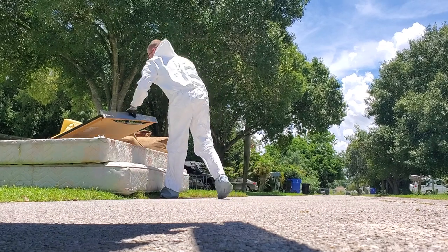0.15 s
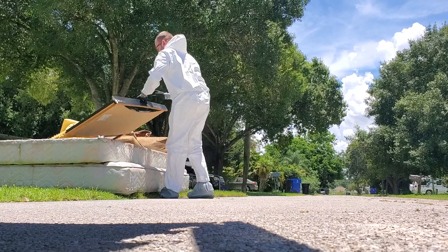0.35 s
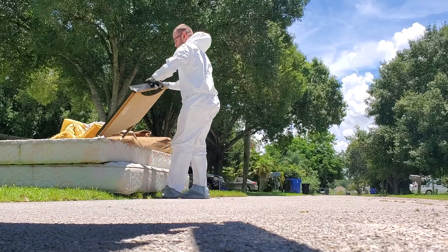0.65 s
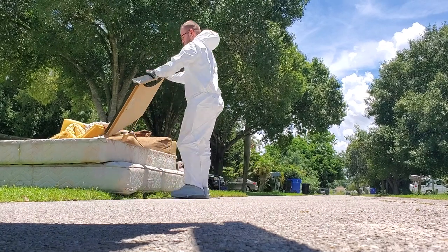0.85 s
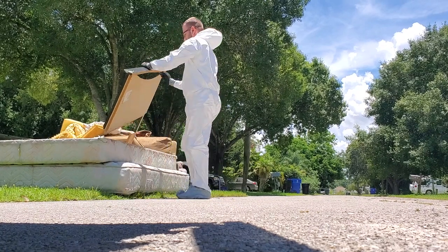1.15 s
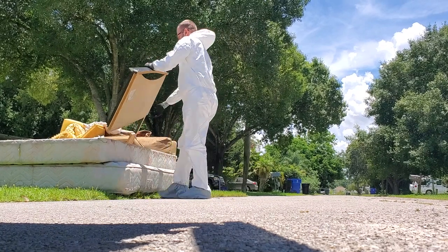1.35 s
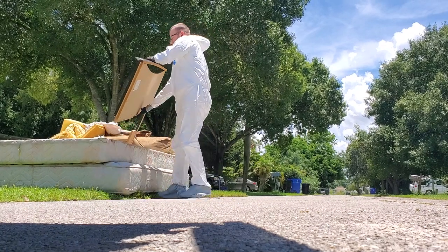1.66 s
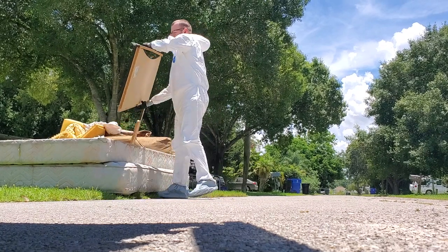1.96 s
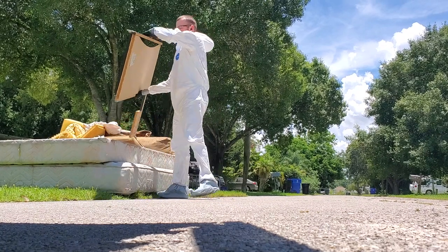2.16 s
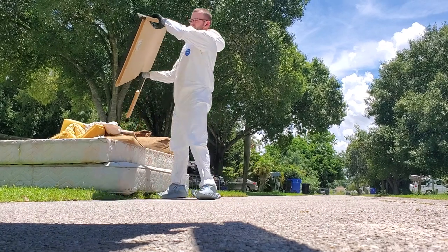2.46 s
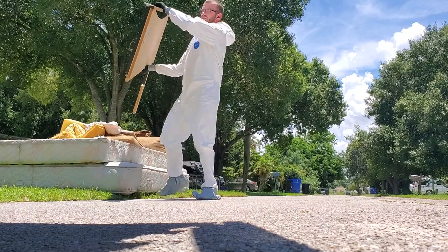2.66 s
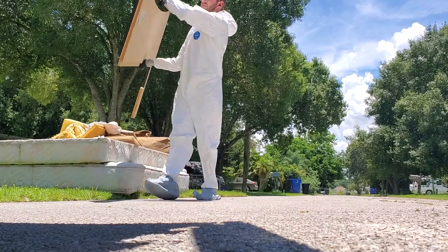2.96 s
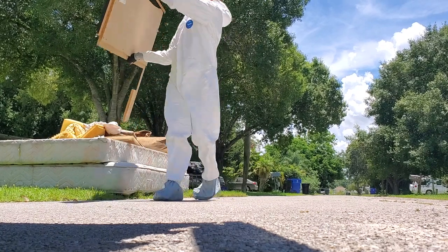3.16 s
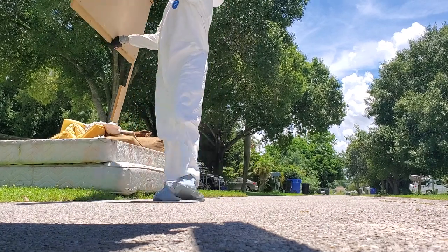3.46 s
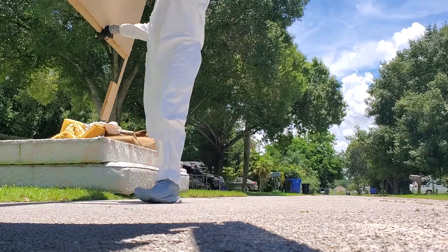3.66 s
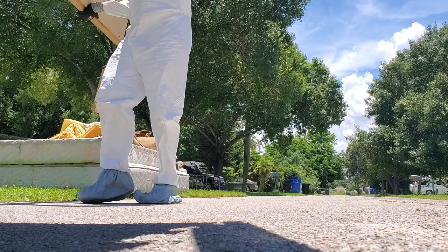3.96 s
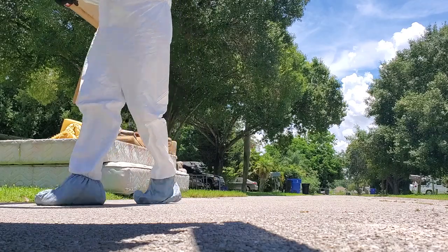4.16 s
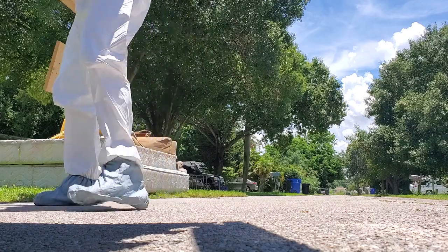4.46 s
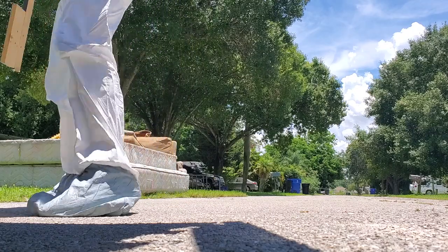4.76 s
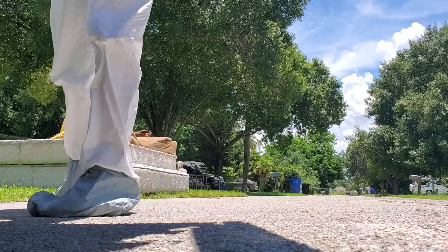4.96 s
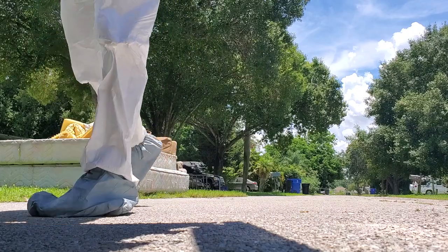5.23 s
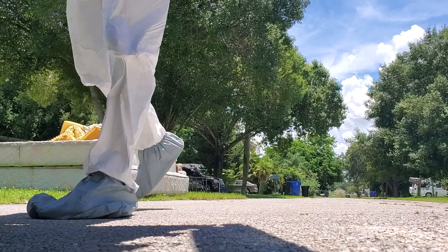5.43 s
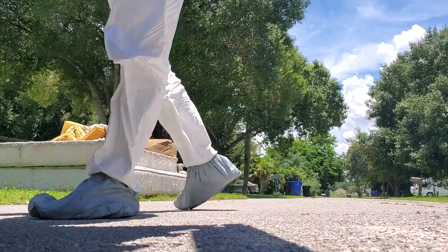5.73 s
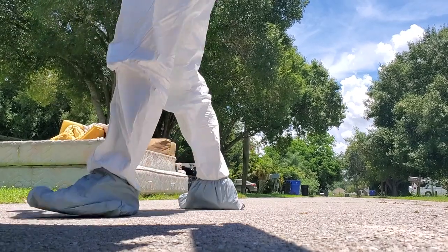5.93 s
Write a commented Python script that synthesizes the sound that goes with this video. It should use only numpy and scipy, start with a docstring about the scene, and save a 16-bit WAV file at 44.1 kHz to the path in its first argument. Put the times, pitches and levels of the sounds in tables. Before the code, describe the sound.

A faint suburban hiss and low traffic rumble run throughout, heard from a microphone on the asphalt. In the first second a plastic coverall swishes and crackles softly as a framed panel is lifted, wobbling with several dull, low flaps. From about 1 to 3 seconds the rustling is fainter, with scattered small ticks of creases and grit. Between 3 and 5.2 seconds shoe covers scuff and the suit swishes more clearly, notably around 3.4, 4.1 and 5 seconds, with a few soft footfalls. At about 5.3 seconds the panel crashes into a steel bin, close and slightly left, far louder than everything before. More blows follow quickly around 5.5, 5.6, 5.7 and 5.8 seconds, each with a rattle whose brightness dies first. The frame thuds heavily and the steel walls boom and ring, fading as the sound ends just after 6 seconds.

```python
"""A framed panel thrown into a steel bin crashes, rattles and booms, just left of a phone on the asphalt.
Each blow starts a rattle that dies first in the treble; the frame thuds and the steel walls ring on.
Before that, a man in a plastic coverall lifts the panel off a kerbside pile and carries it past:
suit and shoe covers rustle, scuff and tick, the panel wobbles. A far suburban rumble lies under it all."""
import sys
import numpy as np
from scipy import signal
from scipy.fft import rfft, irfft, next_fast_len
from scipy.io import wavfile
from scipy.ndimage import uniform_filter1d

SR = 44100
rng = np.random.default_rng(int(sys.argv[2]) if len(sys.argv) > 2 else 0)


def wav_record(signal):
    """Record a signal, one row per channel, as 16-bit PCM in the file named by sys.argv[1]."""
    frames = np.transpose(np.atleast_2d(signal))
    bounded = np.clip(frames, -1, 1)
    # unit amplitude maps onto the largest positive 16-bit level
    quanta = np.round(bounded * 32767).astype(np.int16)
    wavfile.write(sys.argv[1], SR, quanta)


N = 268569

# far hiss spectrum: freq_hz, gain_db
HISS_SPECTRUM = [(71, -32), (120, 7.5), (166, -5), (236, -3), (301, -7.5), (472, -10), (641, -16),
                 (965, -23.5), (1280, -31), (6200, -32.5), (7760, -47.5), (14900, -38.5), (15900, -31)]
# throb of far traffic and flexing panel: time_s, level_db
THROB_LEVELS = [(0, -42), (0.3, -43), (0.6, -41.5), (0.9, -43), (1.15, -39), (1.45, -48.5), (1.76, -39.5),
                (1.92, -60), (2.02, -42.5), (2.6, -45), (3.2, -42.5), (3.55, -45), (4.3, -41),
                (4.45, -47.5), (4.75, -42.5), (5.24, -42)]
# throb spectrum: freq_hz, gain_db
THROB_SPECTRUM = [(15, -66), (25, -30), (39, 6), (59, 5), (108, -2), (140, -15.5), (189, -18), (250, -16),
                  (320, -46), (550, -120)]
# panel flaps and footfalls: start_s, peak_db, pitch_hz, t60_s
THUMPS = [(0.014, -25.5, 84, 0.093), (0.11, -31, 79, 0.089), (0.241, -32.5, 109.3, 0.2),
          (0.389, -33, 80.7, 0.15), (0.43, -32, 62, 0.15), (0.509, -22, 78, 0.16), (0.609, -32, 61.9, 0.07),
          (0.691, -43, 70, 0.12), (0.848, -24.5, 58, 0.085), (0.953, -28, 66, 0.22), (4.11, -32, 90, 0.13),
          (4.819, -42, 70, 0.15), (4.945, -37, 80, 0.14), (5.05, -30, 84, 0.19)]
# rustle registers: centre_hz
RUSTLE_HZ = [240, 480, 950, 1900, 3200, 5200, 7900, 11000]
# share of each rustle register: gain_db
RUSTLE_DB = [-7.5, -5, -9, -6.5, -4, -3.5, -8, 0]
# faint stir of the suit: time_s, level_db, scuff_db
STIR = [(0, -63.5, -60), (0.63, -69, -57.5), (1.1, -64.5, -51.5), (1.6, -71.5, -58.5), (2.0, -78, -61),
        (2.45, -75.5, -61), (2.85, -69.5, -57.5), (3.5, -65, -59), (4.0, -61, -54.5), (4.5, -64.5, -57.5),
        (4.9, -63, -53.5), (5.15, -63, -59), (5.25, -69, -49)]
# suit swishes and shoe cover scuffs; rise and fall span 20 dB:
# start_s, level_db, hold_s, rise_s, fall_s, weight_db, bright_db, crisp_db
SWISHES = [(0.013, -44, .01, 0.0099, 0.11, 11, -1.5, -18),
           (0.222, -48.5, 0.077, 0.043, 0.065, 4, -12.5, -11),
           (0.314, -44.5, .005, .02, 0.18, -7, -12, -13), (0.394, -46, 0.048, 0.16, .05, -0.5, -5.5, -11),
           (0.516, -51.5, .01, 0.029, 0.075, 13, -7, -10), (0.686, -53, 0.089, 0.068, 0.11, -3, 1, -4.5),
           (0.764, -42, 0.059, 0.048, .05, 3, -4.5, -13.5), (0.927, -41, .005, 0.029, 0.082, -4, -6, -11),
           (1.212, -62, .005, .15, 0.079, -5, -5.5, -22), (1.371, -55, .005, 0.064, 0.069, -6, -1.5, -4),
           (1.459, -53.5, 0.0044, 0.016, 0.12, 0, -6, -7), (1.687, -57.5, 0.0044, 0.082, 0.042, -4, 0, -4),
           (2.082, -59, 0.023, .06, .17, 5, -7, -12), (2.301, -66.5, .005, 0.23, .03, 10, -3, -4),
           (2.514, -61.5, .005, 0.023, .05, -4, -2, 0.5), (2.69, -59, .005, .25, .14, -9, -1.5, -3.5),
           (2.954, -47, .005, 0.057, 0.32, -8.5, -4.5, -7.5), (3.05, -53.5, .005, .05, 0.13, -6, -3, -7),
           (3.225, -56.5, .005, 0.25, 0.12, 5.5, -4, -5.5), (3.337, -48.5, .02, 0.012, .05, -1, 3, -2),
           (3.367, -37.5, 0.019, 0.035, 0.06, -1.5, -2, -7),
           (3.462, -52.5, .005, 0.013, 0.054, -1, 1.5, -2), (3.636, -59, .005, 0.027, 0.26, 7, -5, -7),
           (3.72, -62.5, 0.17, .08, 0.51, 3, -12, -5), (3.985, -57.5, .03, .03, .05, -3, 1.5, 2.5),
           (4.03, -45.5, 0.018, 0.028, 0.035, -6, 3.5, 2), (4.066, -49.5, 0.057, 0.044, .05, 2, 2, 2.5),
           (4.134, -44, 0.024, 0.063, 0.045, -0.5, -14, -15),
           (4.248, -53.5, .005, 0.25, 0.099, 3.5, -12, -4),
           (4.678, -59.5, .07, 0.037, 0.27, 8.5, -1.5, 1.5), (4.952, -48, 0.055, 0.048, 0.11, 4, 2.5, -2.5),
           (5.06, -46, 0.061, 0.17, 0.031, 2.5, -6, -6)]
# single creases and grit: start_s, relative_db, pitch_hz, t60_s, knock_offset_db, snap_offset_db
TICKS = [(0.0209, -27.5, 3100, 0.016, -17, -26), (0.0344, -36, 2480, 0.018, -16, -26),
         (0.0603, -40, 3280, 0.02, -15, -23), (0.0817, -36, 3570, 0.023, -20, -29),
         (0.2109, -43.5, 2550, 0.038, 5, -25), (0.2843, -40.5, 2920, 0.032, 3, -22),
         (0.3162, -34, 2460, 0.026, -21, -26), (0.5187, -37.5, 2280, 0.018, 0.5, -5),
         (0.5252, -32, 2530, 0.017, -3, -28), (0.9113, -38.5, 1380, 0.022, -7, -20),
         (1.3359, -49, 5470, 0.02, -11, -16), (1.3758, -46, 2300, 0.022, -10, -19),
         (1.457, -37.5, 1340, 0.029, -11, 13), (1.8098, -48.5, 2780, 0.015, -7, -24),
         (2.0887, -37, 4620, 0.03, -10, -26), (2.2458, -61, 2690, 0.02, 1, -14),
         (2.5122, -49, 1310, 0.02, -11, -17), (3.235, -45.5, 1200, 0.023, -7, -15),
         (3.3343, -40, 2050, 0.022, -3.5, -16), (3.4585, -41, 2770, 0.017, -8, -17),
         (3.6316, -46.5, 1920, 0.023, -12, -17), (4.0262, -35.5, 1930, 0.022, -5, -10),
         (4.0647, -38, 1420, 0.018, -6, -12), (4.1485, -26, 2380, 0.018, -15, -29),
         (4.6804, -51.5, 1200, 0.02, 13.5, -1), (4.7361, -41, 1210, 0.018, 1.5, -19),
         (4.7844, -46.5, 1170, 0.022, -7, -10), (5.1188, -32.5, 2850, 0.038, -13, -24)]
# ringing of the bin walls: time_s, boom_gain_db, drum_gain_db
WALL_GAINS = [(5.268, -13, -11.5), (5.38, -19, -19), (5.44, -15, -24.5), (5.522, -8, -16),
              (5.64, -13.5, -23.5), (5.8, -10.5, -19.5), (5.96, -13, -27), (6.09, -10.5, -26)]
# low bin modes: freq_hz, width_hz, gain_db
BOOM_MODES = [(63, 14, 0.5), (88.7, 14.5, -1.5), (125.6, 20, -2.5)]
# steel plate modes: freq_hz, gain_db, ring_factor
PLATE_MODES = [(343.4, 7, 0.34), (615, 2, 5.8), (656, -11, 0.96), (794, -3.5, 0.6), (927, -8, 0.56),
               (1070, -28, 0.69), (1357, -14, 0.4), (1600, -25, 0.71), (1782, -16, 0.7), (1990, -20, 0.41),
               (2100, -31, 0.26), (2260, -31, 0.49), (2490, -43, 0.48), (2700, -39, 0.48)]
# blows in the bin: start_s, gain_db, hardness_db_per_octave, rise_s, ring_factor
BLOWS = [(5.266, -13, 1.5, 0.003, 1.3), (5.294, -9, 3.6, 0.0036, 0.82), (5.495, -12, 3, 0.0035, 0.58),
         (5.618, -18.5, -1.5, 0.0028, 0.58), (5.6379, -7, 1.1, 0.0021, 1.34),
         (5.7058, -4, 2.5, 0.0029, 1.04), (5.7294, -26, 5, 0.003, 3.1), (5.7975, -17, -2.5, 0.0022, 1.5),
         (5.858, -26.5, -2.7, 0.0032, 3), (5.9502, -33, -6, 0.003, 1.1)]
# clatter spectrum: freq_hz, gain_db
CLATTER_SPECTRUM = [(88, -27), (150, 2), (249, -5), (398, -5), (834, -5.5), (1210, -12), (1930, -10.5),
                    (3460, -14.5), (4290, -15), (6470, -20.5), (8170, -33), (15900, -37.5)]
# clatter decay per register: centre_hz, base_t60_s
CLATTER_DECAY = [(250, 1), (500, 0.69), (1000, 0.67), (2000, 0.42), (3500, 0.25), (6000, 0.18),
                 (11000, 0.18)]
# frame landing on steel: start_s, peak_db, pitch_hz, t60_s
THUDS = [(5.2646, -7.5, 235, 0.017), (5.271, -5., 477, 0.033), (5.27, -9.5, 89.9, 0.38),
         (5.407, -7.5, 94.4, 0.2), (5.497, -4.5, 67.5, 0.26), (5.597, -4.5, 63.5, 0.098),
         (5.805, -8.5, 70.7, 0.34)]


def undb(db):
    return 10 ** (np.asarray(db) / 20)


def level(x, rms_db):
    return x * undb(rms_db) / np.sqrt(np.mean(x ** 2))


def pan(left_minus_right_db):
    return undb([[left_minus_right_db / 2], [-left_minus_right_db / 2]])


def curve(table):
    """Table columns, interpolated per sample."""
    time_s, *columns = np.transpose(table)
    return [np.interp(np.arange(N) / SR, time_s, column) for column in columns]


def colour(x, spectrum, size=4096):
    """Minimum-phase filter, via the cepstrum."""
    hz, db = np.transpose(spectrum)
    log_hz = np.log(np.arange(size // 2 + 1) * SR / size + 1)
    cepstrum = irfft(np.interp(log_hz, np.log(hz), db) * np.log(10) / 20)
    cepstrum[1:size // 2] *= 2
    cepstrum[size // 2 + 1:] = 0
    impulse = irfft(np.exp(rfft(cepstrum)))
    return signal.fftconvolve(x, impulse[None], axes=1)[:, :x.shape[1]]


def band(x, low_hz, high_hz):
    sos = signal.butter(2, [low_hz, min(high_hz, SR / 2.1)], "band", fs=SR, output="sos")
    return signal.sosfilt(sos, x)


def highpass(x, hz):
    return signal.sosfilt(signal.butter(1, hz, "high", fs=SR, output="sos"), x)


def registers(x, centres_hz):
    """Overlapping bands that sum to x."""
    size = next_fast_len(x.shape[1])
    spectrum = rfft(x, size)
    log_hz = np.log(np.arange(size // 2 + 1) * SR / size + 1)
    weights = [np.interp(log_hz, np.log(centres_hz), row) for row in np.eye(len(centres_hz))]
    return [irfft(spectrum * weight, size)[:, :x.shape[1]] for weight in weights]


def walk(rate_hz):
    """Smoothed random steps, spread near 1."""
    hold = int(SR / rate_hz)
    steps = np.repeat(rng.standard_normal(N // hold + 1), hold)
    return 1.14 * uniform_filter1d(uniform_filter1d(steps, hold), hold)[:N]


def ring(x, hz, t60_s):
    """One decaying mode."""
    radius = np.exp(-np.log(1000) / (t60_s * SR))
    angle = 2 * np.pi * hz / SR
    return signal.lfilter([np.sin(angle)], [1, -2 * radius * np.cos(angle), radius ** 2], x)


def ports(x, lag_samples):
    """Two microphone ports, the right one late."""
    index = np.arange(len(x))
    return np.array([x, np.interp(index - lag_samples, index, x)])


def grains(rate_hz, spread_db, bed, lag_samples, scatter_hz, scatter_db, size=N):
    """Random snaps over even noise; scattered treble takes its own path to each port."""
    snaps = (rng.random(size) < rate_hz / SR) * undb(spread_db * np.minimum(rng.exponential(size=size), 3))
    direct, left, right = rng.standard_normal((3, size)) * np.hypot(level(snaps, 0), bed)
    scatter = undb(scatter_db) * highpass([left, right], scatter_hz)
    return level(ports(direct, lag_samples) + scatter, 0)


def knocks(start_s, peak_db, pitch_hz, t60_s, noise_share, band_ratio, contact=1.1):
    """Short knocks: pitched ring, sharp contact, rough tail."""
    track, t = np.zeros(N + SR), np.arange(SR // 5) / SR
    for onset_s, db, hz, decay_s in np.broadcast(start_s, peak_db, pitch_hz, t60_s):
        grit = rng.standard_normal(len(t))
        grit[0] += contact * np.sqrt(SR / hz)
        rough = level(band(grit, hz / band_ratio, hz * band_ratio), -3.5)
        tone = np.sin(2 * np.pi * hz * t)
        knock = ((1 - noise_share) * tone + noise_share * rough) * 1000. ** (-t / decay_s)
        first = int(onset_s * SR)
        track[first:first + len(t)] += undb(db) * knock / np.abs(knock).max()
    return track[:N]


def far_hiss():
    """Smooth suburban noise, treble leaning left."""
    mid, side = colour(rng.standard_normal((2, N)), HISS_SPECTRUM)
    side = highpass(side, hz=600)
    hiss = level(np.array([mid + side, mid - side]), rms_db=-53) * undb(2.5 * walk(rate_hz=2.89))
    return hiss + 0.44 * highpass(hiss, hz=900) * [[1], [-1]]


def low_throb():
    """Wavering bass of far traffic and flexing panel, with flaps and footfalls."""
    bass = level(colour(rng.standard_normal((1, N)), THROB_SPECTRUM), 0)
    throb = bass * undb(curve(THROB_LEVELS)[0] + walk(rate_hz=18))
    thumps = knocks(*np.transpose(THUMPS), noise_share=0.36, band_ratio=1.92, contact=0.37)
    return (throb + thumps) * pan(1.2)


def tints_db(weight_db, bright_db, crisp_db):
    """Lift per rustle register: weight for the low scuff, bright and crisp for the top."""
    return [weight_db, weight_db, weight_db / 3, 0,
            bright_db / 3, bright_db, (bright_db + crisp_db) / 2, crisp_db]


def suit_rustle():
    """Creasing plastic and grit crackle in swishes over a faint stir."""
    start_s, level_db, hold_s, rise_s, fall_s, *tone_db = np.transpose(SWISHES)[:, :, None]
    t = np.arange(N) / SR
    coarse_s = t[::44]
    away = np.maximum((start_s - coarse_s) / rise_s, (coarse_s - start_s - hold_s) / fall_s)
    swells = undb(-20 * np.clip(away, 0, 6))
    stir_db, scuff_db = curve(STIR)
    stir_tints = tints_db(scuff_db - stir_db, bright_db=-1.5, crisp_db=-0.9)
    crackle = grains(rate_hz=1500, spread_db=1.9, bed=1.62, lag_samples=2.14,
                     scatter_hz=1170, scatter_db=4.3)
    crackle = band(crackle * undb(walk(rate_hz=40)), 190, 15400)
    parts = registers(crackle, RUSTLE_HZ)
    rustle = 0
    for part, share_db, swish_tint, stir_tint in zip(parts, RUSTLE_DB, tints_db(*tone_db), stir_tints):
        power = np.sum((undb(level_db + swish_tint) * swells) ** 2, axis=0)
        swish = np.interp(t, coarse_s, np.sqrt(power)) * pan(1.7)
        stir = undb(stir_db + stir_tint) * pan(2)
        flicker_db = 0.98 * walk(rate_hz=25.06) + 1.75 * walk(rate_hz=150)  # folds open and close
        rustle += level(part, share_db) * np.hypot(swish, stir) * undb(flicker_db)
    return rustle * (t < STIR[-1][0])


def crease_ticks():
    """Single creases and grit: a click with a low knock and a top snap."""
    start_s, db, pitch_hz, t60_s, knock_db, snap_db = np.transpose(TICKS)
    click = knocks(start_s, db + 3, pitch_hz, t60_s, noise_share=0.55, band_ratio=1.9)
    knock = knocks(start_s, db + knock_db, 659, 1.1 * t60_s, noise_share=1, band_ratio=1.1)
    snap = knocks(start_s, db + snap_db - 2.5, 11500, 0.7 * t60_s, noise_share=1, band_ratio=1.45)
    return ports(click + knock + snap, lag_samples=2.7) * pan(1.7)


def bin_walls(rattle, t):
    """The rattle drives the low modes and steel plates of the bin."""
    boom_db, drum_db = (gain_db[-len(t):] for gain_db in curve(WALL_GAINS))
    boom = sum(undb(db) * ring(rattle, hz, t60_s=2.27 / width_hz) * np.sqrt(width_hz)
               for hz, width_hz, db in BOOM_MODES)
    plates = sum(undb(db) * ring(rattle, hz, t60_s=0.64 * ring_factor) / np.sqrt(ring_factor)
                 for hz, db, ring_factor in PLATE_MODES)
    drum = level(plates, -6.5) + level(band(rattle, 202, 607), -3.26)
    return (level(boom, -3) * undb(boom_db) + drum * undb(drum_db)) * (t > BLOWS[0][0])


def panel_clatter(rattle, t):
    """Each blow starts a burst of rattle; treble dies first."""
    parts = registers(rattle, [hz for hz, _ in CLATTER_DECAY])
    clatter = 0
    for part, (hz, base_t60_s) in zip(parts, CLATTER_DECAY):
        power = 0
        for start_s, gain_db, hardness_db_per_octave, rise_s, ring_factor in BLOWS:
            age_s = np.maximum(t - start_s, 0)
            contact = 1 + 0.12 * np.exp(-age_s / 0.0026)
            attack = 1 - np.exp(-age_s / rise_s)
            decay = 1000. ** (-age_s / (base_t60_s * ring_factor))
            gain = undb(gain_db + hardness_db_per_octave * np.log2(hz / 3000))
            power += (gain * contact * attack * decay) ** 2
        chatter_db = 2.15 * walk(rate_hz=120)[-len(t):]  # loose pieces
        clatter += part * np.sqrt(power) * undb(chatter_db)
    rattle_rms = np.std(band(colour(rattle, CLATTER_SPECTRUM), 1200, 7000))
    return colour(clatter, CLATTER_SPECTRUM) / rattle_rms * undb(-6)


def bin_crash():
    """The panel lands in the bin: clatter, ringing walls, thuds of the frame's weight."""
    first = int(5.2 * SR)
    t = np.arange(first, N) / SR
    rattle = grains(rate_hz=5000, spread_db=2.9, bed=1.08, lag_samples=19,
                    scatter_hz=850, scatter_db=1.4, size=len(t))
    crash = np.pad(panel_clatter(rattle, t) + bin_walls(rattle, t), ((0, 0), (first, 0)))
    thuds = knocks(*np.transpose(THUDS), noise_share=0.23, band_ratio=1.95, contact=0.11)
    return (crash + ports(thuds, lag_samples=14.6)) * pan(2.4)


def scene():
    return suit_rustle() + crease_ticks() + low_throb() + far_hiss() + bin_crash()


def record(dry):
    """The phone cuts deep bass, rounds loud peaks and cuts the top."""
    bass_stop_hz, top_hz = 42, 15800
    low_cut = signal.cheby2(4, 17, bass_stop_hz, "high", fs=SR, output="sos")
    high_cut = signal.ellip(12, 0.2, 80, top_hz, fs=SR, output="sos")
    rounded = np.tanh(0.83 * signal.sosfilt(low_cut, dry)) / 0.78
    return signal.sosfilt(high_cut, rounded)


dry = scene()
out = record(dry)
wav_record(out)
```